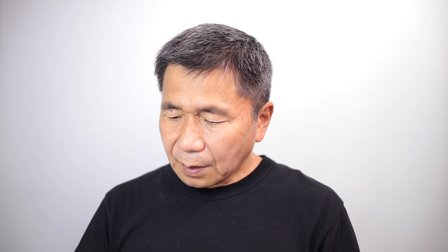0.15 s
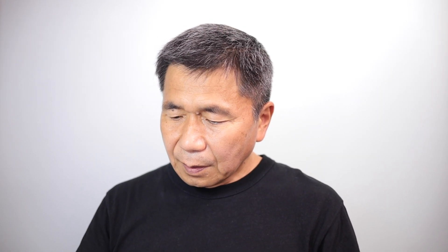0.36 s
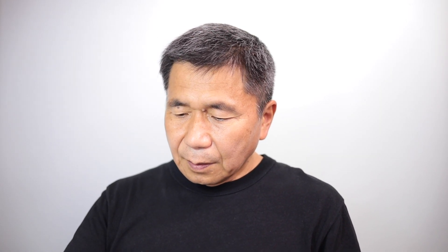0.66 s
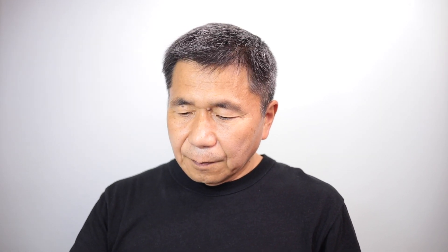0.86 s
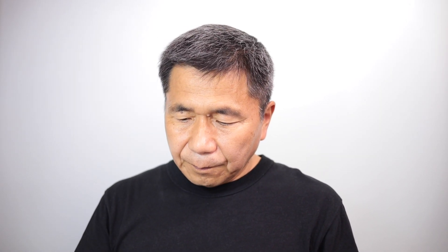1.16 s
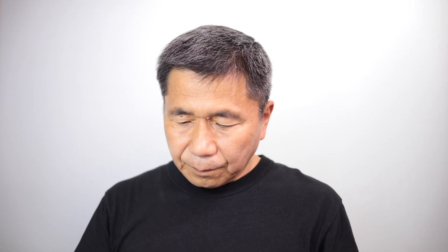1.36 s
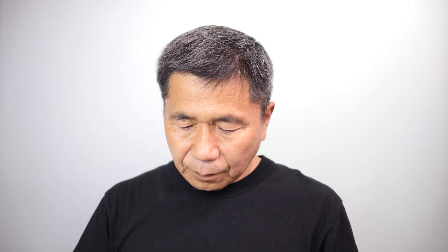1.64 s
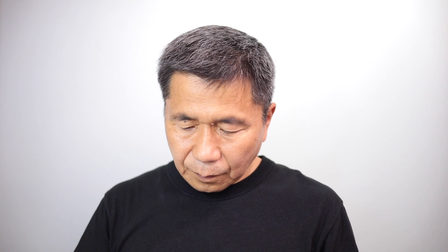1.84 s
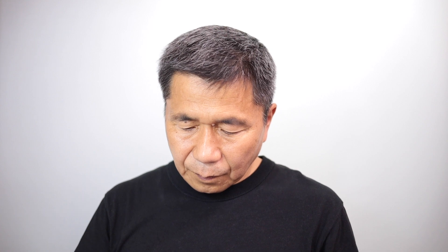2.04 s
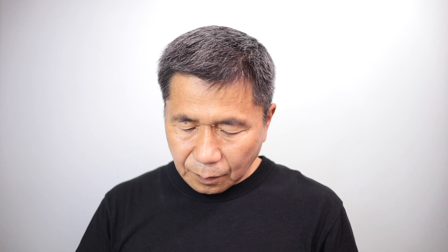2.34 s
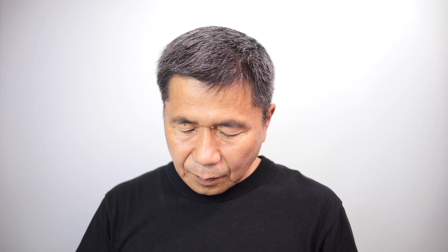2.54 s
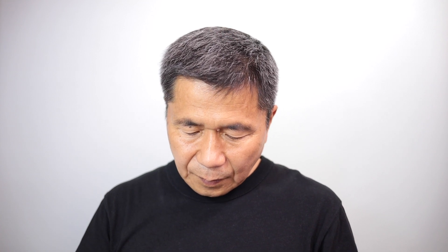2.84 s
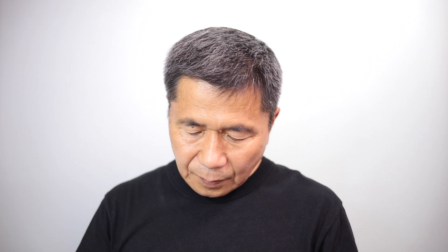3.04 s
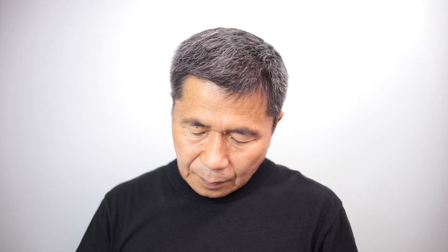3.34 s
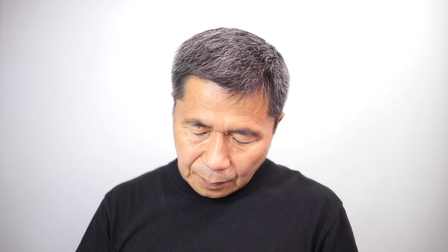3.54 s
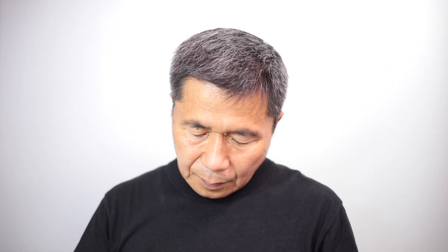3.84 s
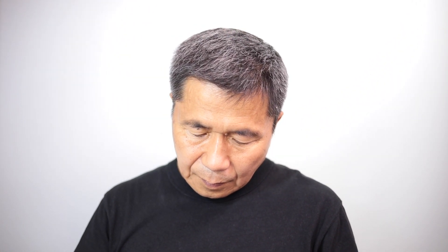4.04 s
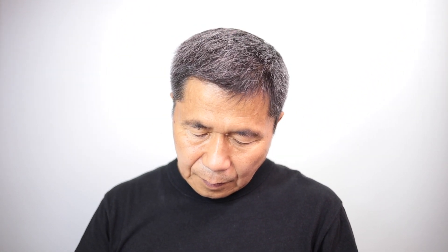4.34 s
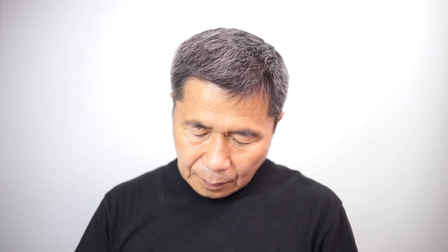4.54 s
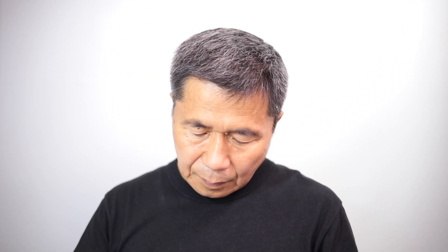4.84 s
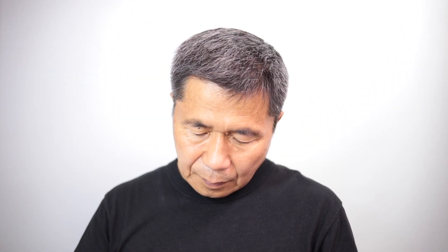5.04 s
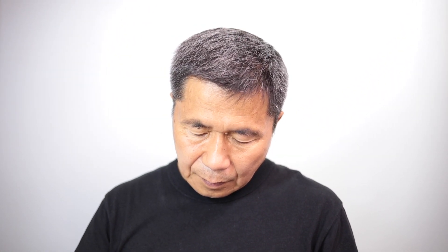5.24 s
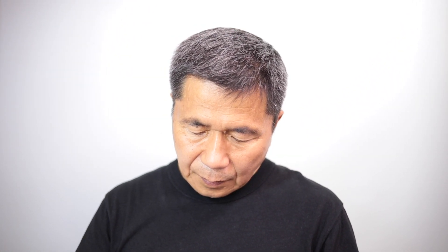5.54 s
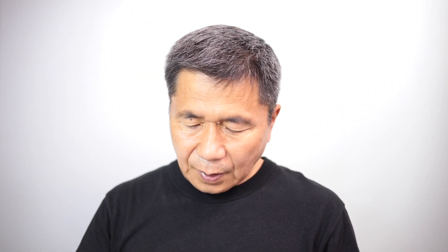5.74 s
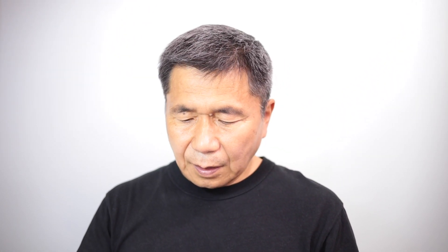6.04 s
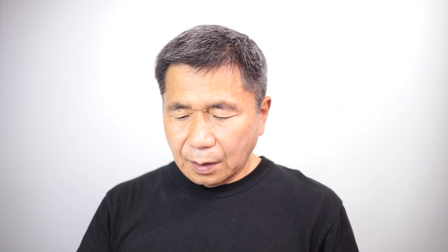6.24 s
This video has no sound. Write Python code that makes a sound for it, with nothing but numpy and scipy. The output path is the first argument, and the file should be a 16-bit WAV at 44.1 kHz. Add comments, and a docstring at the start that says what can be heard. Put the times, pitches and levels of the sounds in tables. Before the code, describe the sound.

Close handling of camera parts: brief squeak, faint rubs, a cluster of mount knocks, one sharp locking click and a bright cap snap over low hum.

```python
"""Small, dry room with beating mains hums, fan tones, thin electronic whine, hissing air and low rumble.
Close by, a lens is changed: shaped noise rubs, scuffs, grinds and squeaks as parts slide in the hands;
decaying modes and noise bursts make the knocks, ticks and thuds at the bayonet and its hard locking
click. A cap gives dully and snaps on with a thin, bright ring. Each hit but the thuds has a short,
diffuse room tail."""
import sys
import numpy as np
from scipy import signal
from scipy.fft import rfft, irfft, next_fast_len
from scipy.io import wavfile
from scipy.ndimage import map_coordinates

SR = 44100
rng = np.random.default_rng(int(sys.argv[2]) if len(sys.argv) > 2 else 0)


def dump_mix(stems):
    """Bounce the given channels to the path in sys.argv[1] as a 16-bit WAV at rate SR."""
    frames = np.atleast_2d(stems).T  # one column per channel
    limited = np.clip(frames, -1, 1)  # hard clip at full scale
    pcm = np.round(limited * 32767).astype(np.int16)
    wavfile.write(sys.argv[1], SR, pcm)


N = 281738
T = np.arange(N) / SR  # s
AGE = T[:SR // 4]  # s since the start of a hit


def amp(db):
    """Decibels to gain."""
    return 10 ** (np.asarray(db) / 20)


def unit(x):
    """Scale to rms 1."""
    return x / np.sqrt(np.mean(x ** 2) + 1e-20)


def unit_attack(x):
    """Scale a hit to rms 1 over its first 4 ms."""
    return x / np.sqrt(np.mean(x[:SR // 250] ** 2) + 1e-20)


def along(points, hz):
    """Interpolate (f/Hz, value) points on a log frequency axis."""
    f, v = np.transpose(points)
    return np.interp(np.log(hz + 1), np.log(f), v)


def wobble(rate_hz):
    """Smooth random curve, rate_hz knots a second."""
    knots = rng.standard_normal(int(N * rate_hz / SR) + 4)
    return map_coordinates(knots, [T * rate_hz])


def filtered(x, response):
    """Apply a gain given as a function of f/Hz."""
    n = x.shape[-1]
    m = next_fast_len(n + 8192)  # zero padding limits wrap-around
    gain = response(np.fft.rfftfreq(m, 1 / SR))
    return irfft(rfft(x, m) * gain, m)[..., :n]


def noise(spectrum, size=N):
    """Coloured noise of rms 1."""
    white = rng.standard_normal(size)
    return unit(filtered(white, lambda hz: amp(along(spectrum, hz))))


def resonate(x, modes):
    """Sum of parallel (f/Hz, width/Hz, level/dB) band-pass resonances, at rms 1."""
    def response(f):
        return sum(amp(db) * 1j * f * w / (c * c - f * f + 1j * f * w) for c, w, db in modes)
    return unit(filtered(x, response))


def add(track, s, sound):
    """Mix a sound into a track at s seconds."""
    part = track[round(s * SR):][:len(sound)]
    part += sound[:len(part)]


def swells(rows):
    """Gaussian swells from (t/s, sigma/s, level/dB) rows."""
    return sum(amp(db) * np.exp(-.5 * ((T - s) / sigma) ** 2) for s, sigma, db in rows)


def air():
    """Hissing air, plus low rumble with added swells; both are coloured noise."""
    air_db, rumble_db = -55.5, -60.5
    # Hiss colour: f/Hz, density/dB
    air_spectrum = [(90, -22), (170, -13.5), (270, -14.5), (330, -13.5), (420, -7.5), (500, -9),
                    (650, -13.5), (850, -12.5), (1060, -10.5), (1700, -19), (2150, -19), (2900, -23),
                    (3650, -22), (4200, -26), (5500, -28.5), (10000, -27.5), (12400, -25.5), (16000, -33)]
    # Rumble colour: f/Hz, density/dB
    rumble_spectrum = [(15, -10), (30, 0.5), (50, 1.5), (62, 7.5), (76, -28), (110, -3), (170, -18),
                       (300, -39), (600, -63)]
    # Rumble swells above the steady level: t/s, sigma/s, level/dB
    rumble_swells = [(3.95, 0.17, -60.5), (6.2, 0.16, -60)]
    rumble_gain = amp(rumble_db) + swells(rumble_swells)
    return amp(air_db) * noise(air_spectrum) + rumble_gain * noise(rumble_spectrum)


def mains_hum():
    """Two hums near twice the line frequency drift in and out of step, so their sum beats."""
    hum_hz, hum_db, second_hum_db = 120.3, -51.5, -55.5
    beat_hz, opposed_s = 0.13, 4.59  # pitch difference; time of deepest cancellation
    phase = 2 * np.pi * hum_hz * T + .04 * wobble(5)
    drift = 2 * np.pi * beat_hz * (T - opposed_s)
    return amp(hum_db) * unit(np.sin(phase)) - amp(second_hum_db) * unit(np.sin(phase - drift))


def fan_tones():
    """Steady-pitched fan sines, slightly unsteady in level and phase."""
    # Fan tones: f/Hz, level/dB
    tone_rows = [(56, -65), (90.5, -64.5), (240.2, -68), (435, -60.5), (543.8, -68.5), (652.7, -76),
                 (780, -73.5), (839.8, -68), (894, -98), (1441, -71), (1530, -79.5), (2040, -74)]
    tones = np.zeros(N)
    for hz, db in tone_rows:
        level = amp(db + 1.37 * wobble(3.96))
        tones += level * unit(np.sin(2 * np.pi * hz * T + .5 * wobble(5.6)))
    return tones


def electronic_whine():
    """Thin high sines of electronics, blurred by fast phase wander."""
    # Whine: f/Hz, level/dB
    whine_rows = [(3688, -74.5), (4441, -79), (7747, -80.5), (8646, -81), (11343, -78), (11816, -78.5),
                  (12145, -79), (12330, -77), (12570, -79), (13232, -76), (13561, -83), (14465, -80)]
    return sum(amp(db) * unit(np.sin(2 * np.pi * hz * T + 1.1 * wobble(40))) for hz, db in whine_rows)


def room_tone():
    """Sum of hums, fan tones, whine, air and rumble."""
    return mains_hum() + fan_tones() + electronic_whine() + air()


def strokes(rows, modes, grain_db):
    """Swells of grainy friction noise through a surface's resonances, under an uneven hand."""
    grip = amp(grain_db * wobble(700) + 2.1 * wobble(60))
    return swells(rows) * resonate(rng.standard_normal(N) * grip, modes)


def pushes(rows, build_db, stop_db_per_s):
    """Friction grows by build_db over the build-up as the hand pushes, then dies as the part stops."""
    total = np.zeros(N)
    for s, build_s, db in rows:
        drop_db = np.maximum(build_db * (s - T) / build_s, stop_db_per_s * (T - s))
        total += amp(db - drop_db)
    return total


def rubs():
    """Light rubs on smooth plastic: a resonant hiss."""
    # Rubs: t/s at the middle, sigma/s, level/dB
    rub_rows = [(.09, 0.13, -63), (0.743, 0.014, -56), (0.786, .014, -57), (0.802, 0.01, -44),
                (1.288, 0.0046, -48), (1.41, 0.088, -59.5), (2.0, .03, -60.5), (2.21, 0.05, -51.5),
                (2.558, 0.032, -53.5), (6.056, 0.018, -49)]
    # Plastic resonances: f/Hz, width/Hz, level/dB
    rub_modes = [(7560, 460, -0.5), (11450, 440, 3.5), (12900, 1000, 0), (14500, 1200, -11)]
    return strokes(rub_rows, rub_modes, grain_db=1.5)


def scuffs():
    """Gritty scuffs: grainy noise through lower, mostly broader resonances."""
    # Scuffs: t/s at the middle, sigma/s, level/dB
    scuff_rows = [(.744, 0.0066, -57), (.78, 0.01, -48), (.8, 0.004, -45), (3.028, 0.0071, -61.5),
                  (5.675, 0.029, -60.5)]
    # Scuff resonances: f/Hz, width/Hz, level/dB
    scuff_modes = [(4950, 900, -4), (6000, 2300, 8), (7200, 900, -8)]
    return strokes(scuff_rows, scuff_modes, grain_db=1.5)


def squeak():
    """A tight fit excites narrow resonances until the part comes free."""
    free_s, free_fade_s = 0.054, .003
    # Squeak: t/s at the loudest, build-up/s, level/dB
    squeak_rows = [(.02, .05, -36.5)]
    # Squeak resonances: f/Hz, width/Hz, level/dB
    squeak_modes = [(3270, 30, 2), (5360, 36, 4), (7470, 62, 1.5), (9800, 80, -1.5), (12040, 120, -2),
                    (14820, 40, 3), (9000, 8100, -20.5)]
    stuck = .5 - .5 * np.tanh((T - free_s) / free_fade_s)
    push = pushes(squeak_rows, build_db=23, stop_db_per_s=336)
    return stuck * push * resonate(rng.standard_normal(N), squeak_modes)


def grind():
    """Metal faces slide on each other in the mount: rough noise that follows the push."""
    # Slides: t/s at the hardest push, build-up/s, level/dB
    slides = [(.05, 0.072, -40), (4.385, 0.057, -49), (4.475, 0.069, -43), (4.508, .02, -35),
              (4.942, 0.022, -30), (5.02, 0.055, -53)]
    # Grinding colour: f/Hz, density/dB
    grind_spectrum = [(150, -4), (280, -5), (500, -6), (850, 4), (1150, -3), (1600, 5), (2400, -1.5),
                      (3100, -6), (3900, -7.5), (5500, -10.5), (12500, -22), (16000, -8)]
    rough = unit(noise(grind_spectrum) * amp(5.2 * wobble(500)))
    return pushes(slides, build_db=23, stop_db_per_s=750) * rough


def ring(modes, attack_s=0.0002, scatter_db=1):
    """Struck modes, at slightly new strengths for each blow; neighbours swing in opposite senses."""
    hz, db, t60 = np.transpose(modes)[:, :, None]
    size = amp(db + scatter_db * rng.standard_normal(hz.shape) - 60 * AGE / t60)
    swing = np.sin(2 * np.pi * hz * AGE + np.pi * np.arange(len(hz))[:, None])
    return unit_attack((size * swing).sum(0) * (1 - np.exp(-AGE / attack_s)))


def crack(t60_s, top_hz):
    """Brief broadband burst of two faces meeting; a lower top_hz makes it duller."""
    # Colour of a hard contact: f/Hz, density/dB
    crack_spectrum = [(300, -50), (1500, 2.5), (3500, 1), (5500, 2), (7400, 1), (8400, 3.5), (10600, 2.5),
                      (12500, 5.5), (14500, 6), (16000, -8)]
    burst = noise(crack_spectrum, size=len(AGE))
    burst = filtered(burst, lambda hz: 1 / np.sqrt(1 + (hz / top_hz) ** 8))
    return unit_attack(burst * amp(-60 * AGE / t60_s))


def in_room(hit, wet_db, delay_s=0.0044):
    """A hit plus the short, diffuse answer of desk and walls: noise decaying per band."""
    # Room decay: f/Hz, t60/s
    room_decay = [(300, 0.078), (1000, 0.085), (2800, 0.1), (6000, 0.098), (12000, 0.087)]
    hz, t, z = signal.stft(rng.standard_normal(len(AGE)), SR, nperseg=128)
    decay = amp(-60 * t / along(room_decay, hz)[:, None])
    tail = signal.istft(z * decay, SR, nperseg=128)[1][:len(AGE)]
    tail = tail * (AGE > delay_s)
    tail = tail / np.linalg.norm(tail)
    return hit + amp(wet_db) * signal.fftconvolve(hit, tail)[:len(AGE)]


def cap():
    """The shell gives with a dull tick, then its small stiff catch springs into place."""
    # Catch gives way: t/s, level/dB
    gives = [(5.957, -33.5)]
    # Shell modes: f/Hz, level/dB, t60/s
    shell_modes = [(2310, -3.5, 0.019), (2720, -1, 0.014), (3300, 3, 0.0091), (4630, -1.5, 0.011)]
    # Catch springs in: t/s, level/dB
    snaps = [(5.9588, -14)]
    # Spring catch modes: f/Hz, level/dB, t60/s
    catch_modes = [(7260, -11, 0.0058), (8400, -4, .019), (8850, -10, .011), (9500, -8, 0.011),
                   (10340, -5, 0.0093), (11400, -6, .01), (11900, -10, .012), (12640, 5, 0.0081),
                   (13300, -9, 0.01), (14000, -17, .012)]
    track = np.zeros(N)
    for s, db in gives:
        add(track, s, in_room(amp(db) * ring(shell_modes), wet_db=-10.5))
    for s, db in snaps:
        hit = ring(catch_modes) + amp(-18) * crack(t60_s=0.013, top_hz=11500)
        add(track, s, in_room(amp(db) * hit, wet_db=-10.5))
    return track


def thuds():
    """Dull thuds of handled parts: one soft-started decaying mode each."""
    # Thuds: t/s, f/Hz, level/dB, t60/s
    thud_rows = [(.0465, 657, -43, 0.058), (.067, 644, -43.5, 0.025), (.1085, 705, -48, 0.028),
                 (6.007, 173, -51, 0.2), (6.132, 456, -45.5, 0.015)]
    track = np.zeros(N)
    for s, hz, db, t60_s in thud_rows:
        add(track, s, amp(db) * ring([(hz, 0, t60_s)], attack_s=0.00045))
    return track


def contact(knock_db, clack_db, crack_db, top_hz):
    """One contact knocks the body, rings the barrel and cracks at the touching edge."""
    # Camera body modes: f/Hz, level/dB, t60/s
    body_modes = [(284, -12, 0.037), (795, 3, 0.02), (962, 8.5, 0.014), (1048, 5.5, 0.01),
                  (1560, -5.5, 0.027)]
    # Lens barrel modes: f/Hz, level/dB, t60/s
    barrel_modes = [(2150, 7, 0.011), (2380, -16, .01), (2466, -3.5, 0.016), (2730, -2, 0.01),
                    (2980, -6, 0.019), (3430, -6.5, 0.029), (3810, 0, 0.011), (4330, -11, .012)]
    # the changing grip shifts the barrel's modes a little from blow to blow
    gripped = [(hz * np.exp(0.013 * rng.standard_normal()), db, t60) for hz, db, t60 in barrel_modes]
    hit = amp(knock_db) * ring(body_modes) + amp(clack_db) * ring(gripped, scatter_db=5)
    hit = hit + amp(crack_db) * crack(t60_s=0.022, top_hz=top_hz)
    return in_room(hit, wet_db=-6)


def ticks():
    """Light ticks of plastic edges: mostly crack, barely stirring body and barrel."""
    # Ticks: t/s, level/dB, top of the crack f/Hz
    tick_rows = [(.0465, -43, 13000), (.066, -44, 9500), (.189, -46.5, 8240), (.8004, -43.5, 14900),
                 (0.95, -43, 10500), (4.9383, -31, 13000), (4.9956, -43, 15000), (5.008, -38.5, 15000),
                 (5.046, -48.5, 8000), (5.905, -49.5, 7100), (5.9344, -42, 15000)]
    body_db, barrel_db = -12, -31  # relative to the crack
    track = np.zeros(N)
    for s, db, top_hz in tick_rows:
        add(track, s, contact(db + body_db, db + barrel_db, db, top_hz))
    return track


def knocks():
    """Lens on mount: harder knocks shift from body to barrel and crack; stronger ones are brighter."""
    # Knocks: t/s, strength/dB, hardness/0-1
    knock_rows = [(0.0526, -40.5, 0.9), (.084, -50, .4), (.1088, -45.5, 0.1), (3.038, -46, 0.6),
                  (4.2785, -37, 0.3), (4.382, -36.5, 0.16), (4.393, -44, .05), (4.4489, -35, 0.45),
                  (4.4627, -30.5, 0.01), (4.499, -28.5, 0.5), (4.5135, -34, 0.96), (4.6699, -46, 0.73),
                  (4.9124, -43, .15), (4.9444, -25, 1), (5.036, -44.5, 0.4), (6.133, -45.5, 0.6),
                  (6.305, -44.5, 0.15)]
    body_hard_db, barrel_soft_db = -6, -8  # body's share at full hardness, barrel's at none
    crack_soft_db, crack_hard_db = -14.5, -5.5
    firm_db, firm_top_hz, db_per_octave = -30, 14000, 45  # crack brightness against strength
    track = np.zeros(N)
    for s, db, hard in knock_rows:
        soft = 1 - hard
        crack_db = db + soft * crack_soft_db + hard * crack_hard_db
        top_hz = firm_top_hz * 2 ** ((db - firm_db) / db_per_octave)
        add(track, s, contact(db + hard * body_hard_db, db + soft * barrel_soft_db, crack_db, top_hz))
    return track


def latch():
    """The sprung locking pin drops home on the flange: a hard, bright click."""
    # Pin drops: t/s, ring/dB, crack/dB
    latch_rows = [(5.3865, -13.5, -16)]
    # Pin and flange modes: f/Hz, level/dB, t60/s
    flange_modes = [(802, -14, 0.033), (1110, -7, 0.023), (2280, -5, 0.023), (2730, 5, 0.0091),
                    (3000, -5, 0.039), (3140, -1, 0.013), (3840, 5.5, 0.011), (5450, -20, 0.047),
                    (6440, -4, 0.013), (10350, 10, 0.0057), (11300, -4, .018), (11100, -9, .014),
                    (13500, -3, 0.01), (14600, 5, 0.011)]
    track = np.zeros(N)
    for s, ring_db, crack_db in latch_rows:
        hit = amp(ring_db) * ring(flange_modes, attack_s=.0001)
        hit = hit + amp(crack_db) * crack(t60_s=0.03, top_hz=16000)
        add(track, s, in_room(hit, wet_db=-9.5))
    return track


def scene():
    """Everything is centred, with a little filtered air noise differing from left to right."""
    # Side share of the air noise: f/Hz, level/dB
    air_side = [(60, -35), (110, -64), (200, -19), (380, -27.5), (700, -25), (1290, -49), (2380, -29.5),
                (4400, -10.5), (8120, -8), (15000, -11)]
    friction = rubs() + scuffs() + squeak() + grind()
    mid = room_tone() + friction + cap() + thuds() + ticks() + knocks() + latch()
    side = filtered(air(), lambda hz: amp(along(air_side, hz)))
    return np.array([mid + side, mid - side])


def record(dry):
    """Round off the highest peaks, then cut steeply above the band limit."""
    ceiling, top_hz = .8, 15750
    rounded = dry / (1 + (dry / ceiling) ** 6) ** (1 / 6)
    return filtered(rounded, lambda hz: 1 / np.sqrt(1 + (hz / top_hz) ** 160))


dry = scene()
out = record(dry)
dump_mix(out)
```